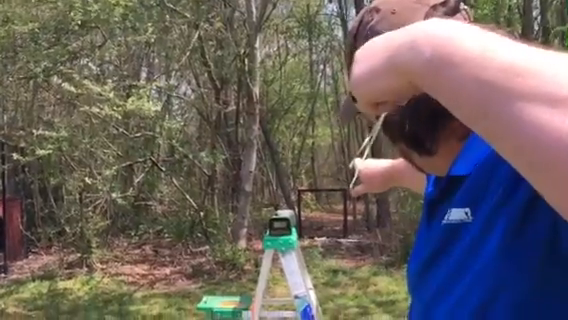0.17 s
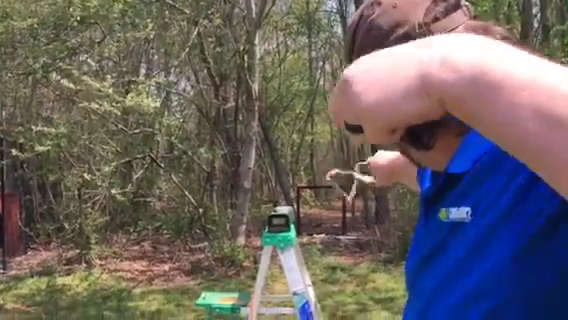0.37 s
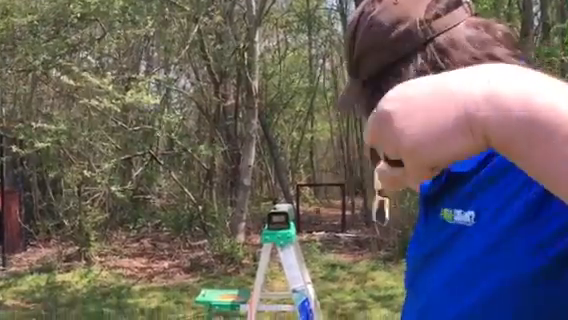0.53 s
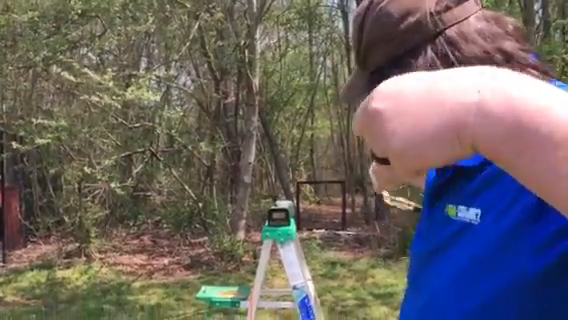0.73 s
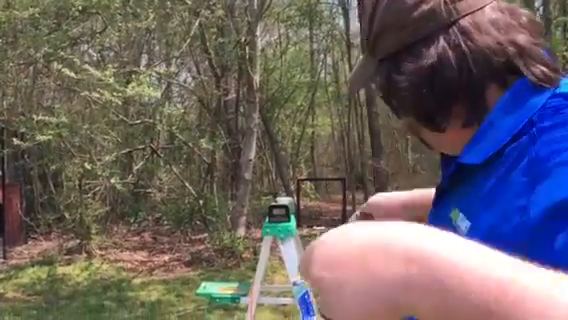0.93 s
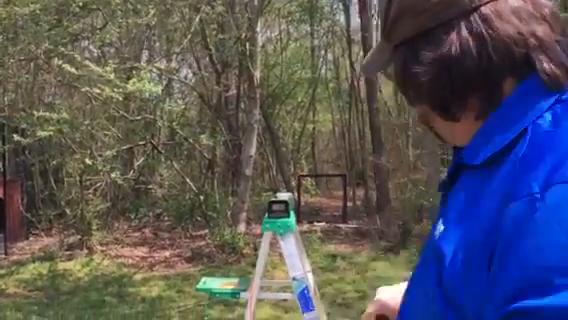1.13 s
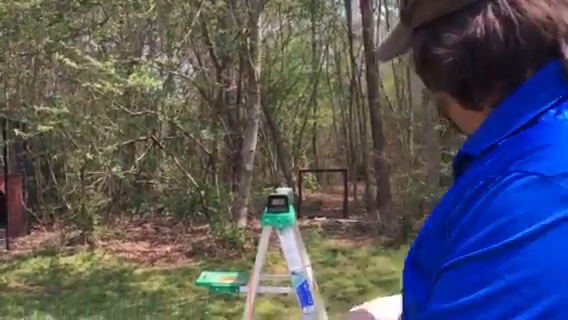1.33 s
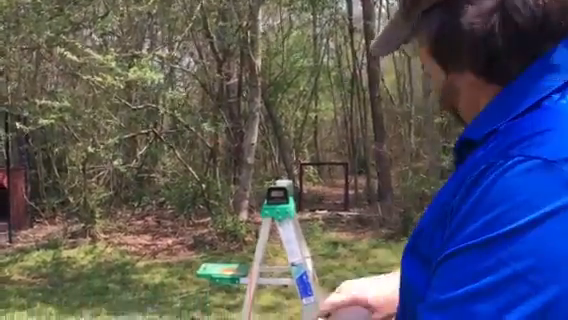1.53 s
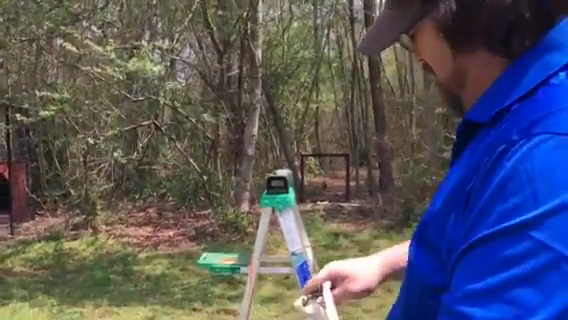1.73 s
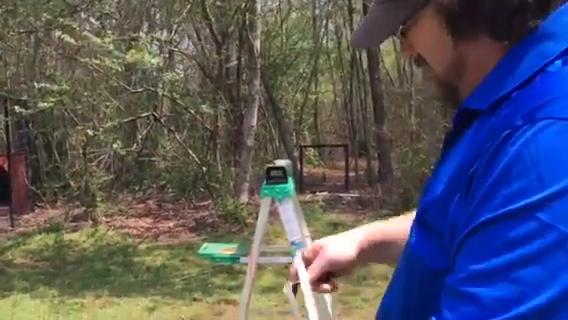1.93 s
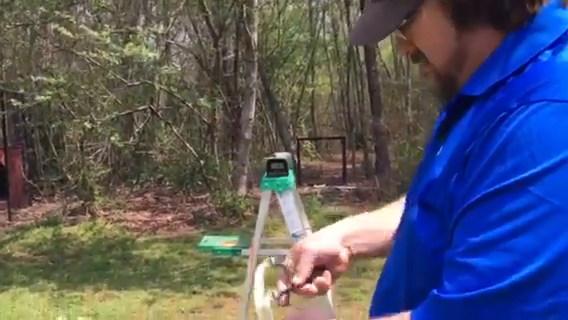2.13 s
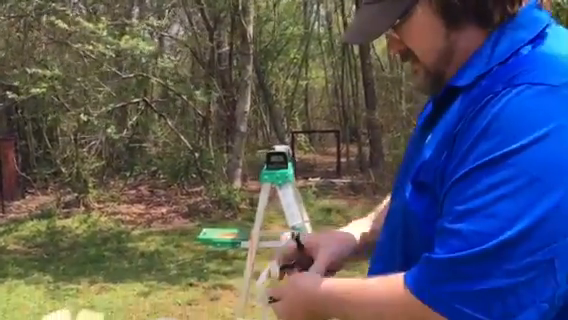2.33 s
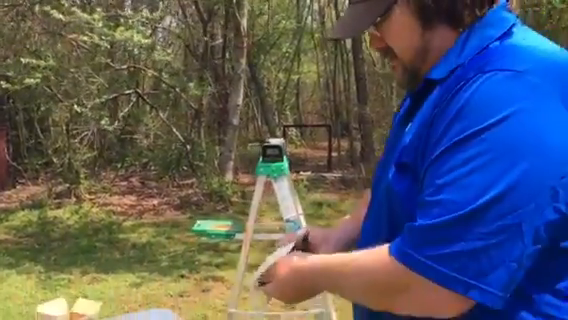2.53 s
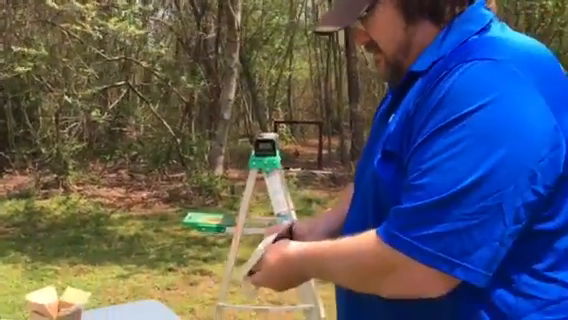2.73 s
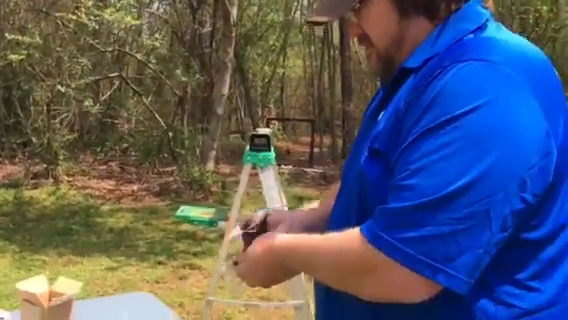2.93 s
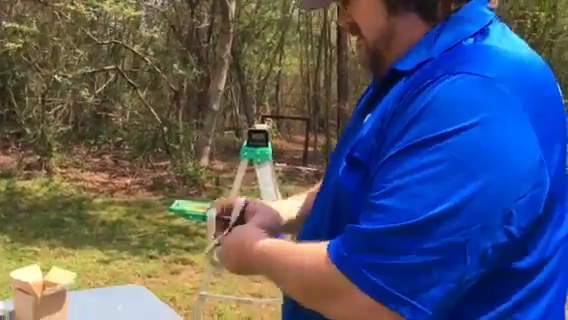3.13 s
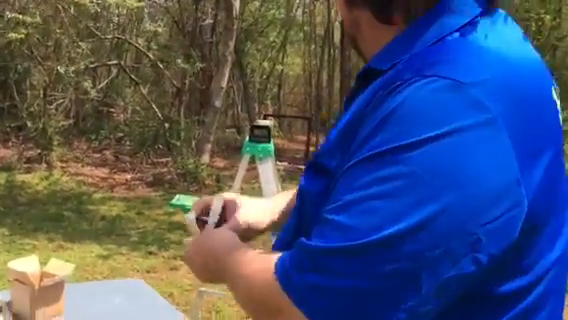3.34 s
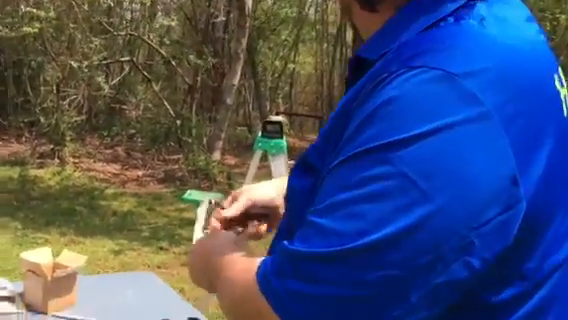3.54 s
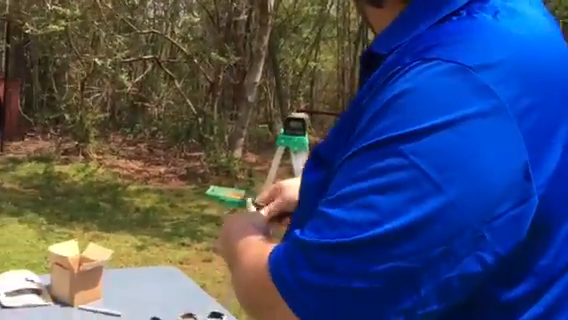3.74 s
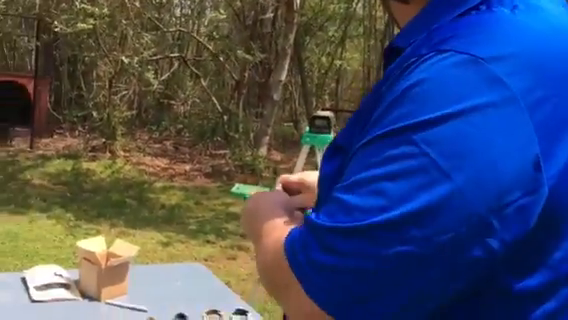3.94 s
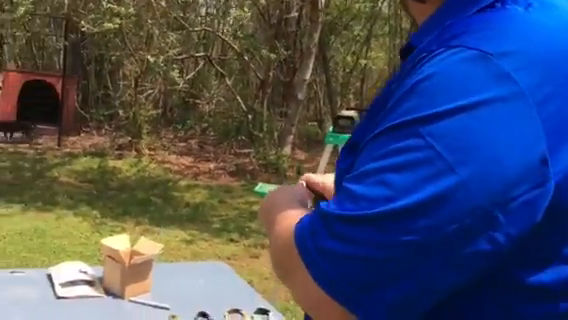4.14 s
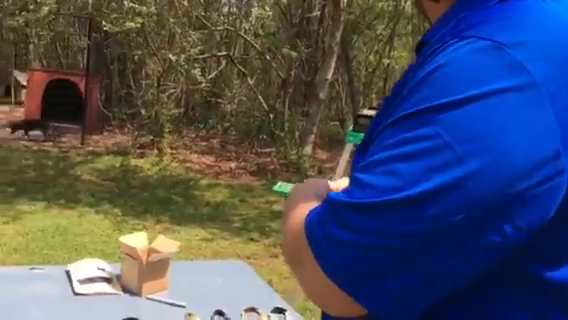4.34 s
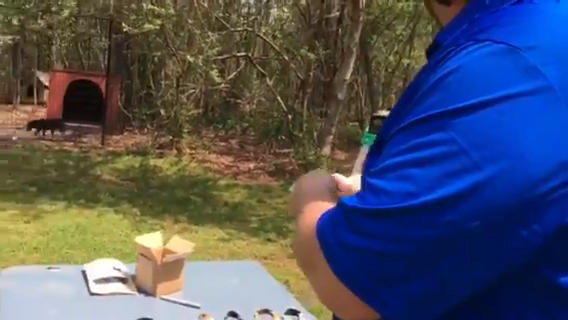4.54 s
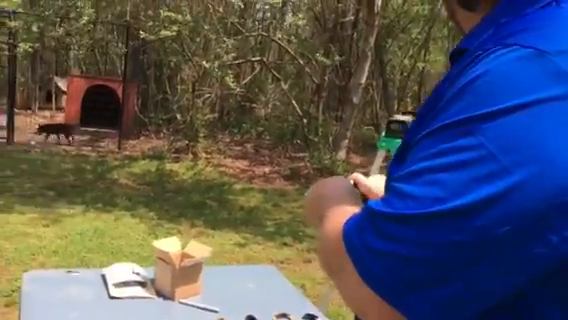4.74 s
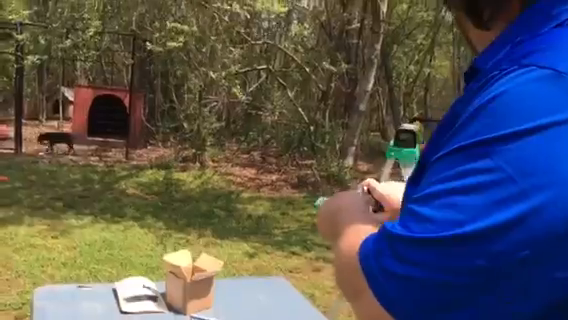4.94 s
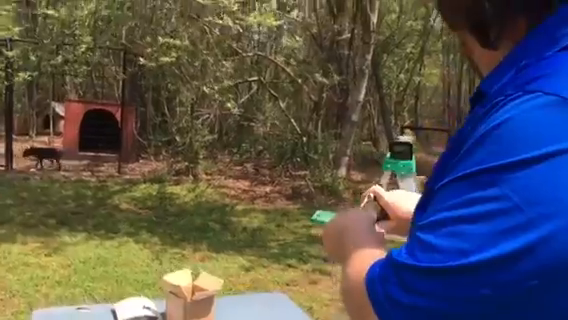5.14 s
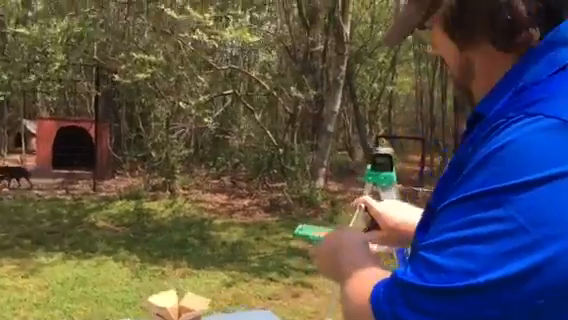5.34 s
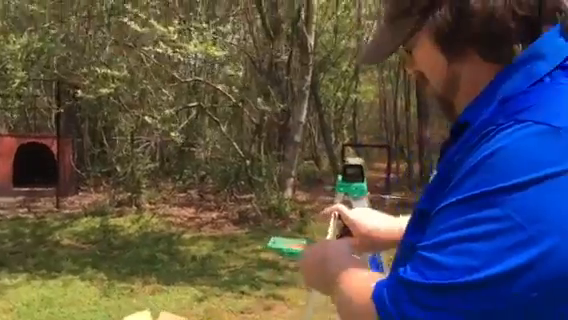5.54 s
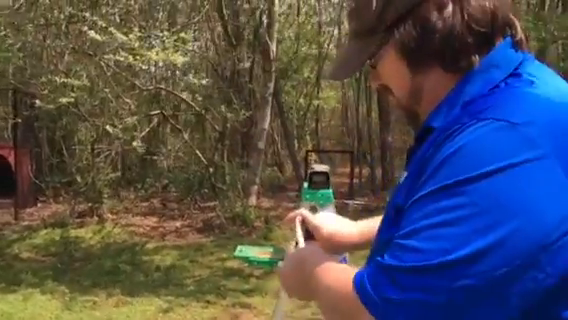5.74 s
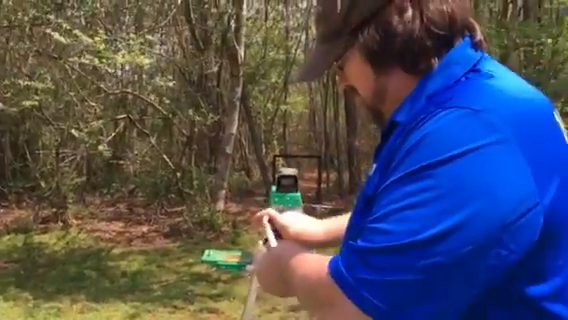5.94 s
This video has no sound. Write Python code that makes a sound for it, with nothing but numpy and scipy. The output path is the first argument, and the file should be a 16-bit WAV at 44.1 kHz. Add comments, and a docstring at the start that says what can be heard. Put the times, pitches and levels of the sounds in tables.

```python
"""A back yard at the edge of a wood: close to the microphone the rubber bands of a slingshot whip forward and
slap twice (grainy coloured noise). Farther off the shot strikes a metal can, which drops and tumbles
(decaying sine modes and noise); the wood answers with a noise tail and two echoes. Close by, hands rub and
sort the bands, with short falling squeaks. Birds whistle among the trees (gliding sines), over a soft
breeze and a distant rush (shaped noise)."""
import sys
import numpy as np
from scipy import signal
from scipy.fft import rfft, irfft, next_fast_len
from scipy.io import wavfile
from scipy.ndimage import map_coordinates

SR = 44100
rng = np.random.default_rng(int(sys.argv[2]) if len(sys.argv) > 2 else 0)


def generate_wav(signal):
    """Clip the signal to [-1, 1] and save it as 16-bit WAV at the path in sys.argv[1]."""
    frames = np.transpose(np.atleast_2d(signal))
    scaled = np.clip(frames, -1, 1) * 32767
    pcm = np.round(scaled).astype(np.int16)
    wavfile.write(sys.argv[1], SR, pcm)


N = 268128

# Spectra are relative: the noise made from them is scaled to rms 1. Shares are of power, 0-1.

# the rubber's snap and the pouch's smack, spectra: f/Hz, level/dB
SNAP_SPECTRUM = [(40, -15), (110, -6.5), (190, 5), (330, -8.5), (600, 4), (1300, -1), (2500, -1.5),
                 (4500, -9), (6600, 1.5), (8500, 0.5), (10300, -7), (12500, -1), (16000, -7)]
SMACK_SPECTRUM = [(60, -17.5), (180, -8.5), (350, -20.5), (700, -17.5), (1400, -20.5), (2300, 1.5),
                  (2800, -7), (3400, 4.5), (4200, -5), (7000, -10), (10300, -15.5), (13000, -9.5),
                  (16000, -16)]
# the bands whip past the fork, then swing back: t/s, level/dB, rebound/dB re snap, share of smack
SNAPS = [(.4, -17, -7, .08), (0.4301, -14.5, -7.5, 0.7)]
# the pouch leaves the fingers, and later cracks against the fork: t/s, level/dB, share of smack
CLICKS = [(0.3785, -41, .2), (.4319, -16.5, .5)]
# rises are e-fold times; the slack rubber slaps again just after each snap
SNAP_RISE_S, SNAP_T60_S, REBOUND_LAG_S, REBOUND_T60_S = 0.0015, 0.014, 0.005, 0.043
# the bands cut the air around the first snap; level re that snap
SWISH_DB, SWISH_RISE_S, SWISH_T60_S = -12.5, 0.0068, 0.07
# air pushed by the pouch, re its snap
FLAP_DB, FLAP_LAG_S = -21, 0.00296
CLICK_RISE_S, CLICK_T60_S = 0.0002, 0.004

# the can's strongest modes, before each blow's level scatter and decay factor: f/Hz, level/dB, t60/s
CAN_MODES = [(835, -8, .08), (885, -14, .2), (912, -12, .22), (1133, -11, .24), (1200, -13, .24),
             (1250, -8, .2), (1436, -7, .22), (1511, -14, .17), (1857, -7, .11), (2229, -9, .14),
             (2275, -7, .1), (2395, -9, .22), (2432, -3, .1), (2540, -11, .16), (3335, -1, .14),
             (3475, -8, .13), (3578, -3, .13), (4480, -6, .1), (4582, -10, .2), (5285, -6, .16),
             (5622, -5, .11), (5990, -5, .12), (6340, -3, .12), (6757, -4, .14), (7311, -9, .17),
             (9355, -16, .2), (11250, -13, .1)]
# the crowd of weaker wall modes, spectrum: f/Hz, level/dB
WALL_SPECTRUM = [(150, -38), (330, -11.5), (700, -9), (950, -3.5), (1400, -4), (2000, -3), (2400, 2.5),
                 (2900, -1.5), (3500, 2), (5000, -2.5), (6500, -4), (8500, -6), (10300, -11.5),
                 (15500, -16.5)]
# their decay, before each blow's decay factor: f/Hz, t60/s
WALL_DECAY = [(300, 0.19), (1200, 0.21), (4000, 0.12), (8000, .13), (15000, 0.061)]
# the crack and the dent thump of a blow, spectra: f/Hz, level/dB
CRACK_SPECTRUM = [(200, -19.5), (800, -3.5), (1700, -10), (3600, -1.5), (6500, 3), (8500, -2), (10300, -14),
                  (12500, -5.5), (16000, -13)]
DENT_SPECTRUM = [(60, -25.5), (220, -22.5), (350, -9.5), (600, -1.5), (900, 3), (1500, -10), (4000, -37)]
# the shot's blow: level/dB, crack/dB, dent/dB, modes/dB, decay factor, rattle depth/dB
STRIKE = (-22, 9, -4.5, -6, 1.05, 0.5)
# the can lands and tumbles: t/s, level/dB
TUMBLES = [(1.0998, -44.5), (1.113, -45.5), (1.1496, -48.5), (1.274, -51), (1.297, -57.5), (1.346, -77),
           (1.4135, -59), (1.465, -63.5), (1.511, -63), (1.69, -60.5)]
STRIKE_S = 0.5764
# softer contacts are duller: crack lost for each dB below the landing
LANDING_CRACK_DB, CRACK_PER_DB = 5, 0.2
GROUND_DENT_DB, GROUND_MODES_DB, GROUND_DECAY_FACTOR, GROUND_RATTLE_DB = -9, -8, 1.45, 3

# hands on rubber and cloth, except the brief one at 2.061 s, a bird's chip made of noise: t/s, level/dB, t60/s,
# share of dull rubbing
RUBS = [(1.087, -51, 0.2, 0.62), (1.984, -65, 0.081, 0.03), (2.061, -62.5, .025, .7),
        (2.215, -66, 0.069, .5), (2.812, -61.5, .17, 0), (3.055, -50, 0.11, 0.3), (3.076, -56.5, .04, 0),
        (3.107, -62, 0.16, 0.44), (3.341, -54, 0.027, 0.01), (3.803, -59.5, 0.15, 0.43),
        (4.67, -69, 0.28, 0), (4.992, -62, 0.028, .3), (5.481, -51, 0.069, 0), (5.507, -50.5, 0.065, 0),
        (5.521, -50, .055, 0.98), (5.769, -67.5, .05, 0.2), (6.01, -67.5, 0.54, 0.23)]
# brisk and dull rubbing, spectra: f/Hz, level/dB
BRISK_SPECTRUM = [(200, -4), (900, 1), (2000, 3), (3500, 1), (7000, 4), (10300, -2.5), (13000, -3.5),
                  (16000, -9)]
DULL_SPECTRUM = [(200, -20), (1150, -16), (1500, -3), (2000, -11), (3500, -1.5), (5500, -7), (9000, -31),
                 (16000, -37)]
# rubber slipping over skin: t/s, level/dB, length/s, start f/Hz, end f/Hz
SQUEAKS = [(3.096, -60, 0.024, 2610, 2283), (3.336, -56.5, 0.01, 2000, 1750), (5.5, -53, .014, 6400, 3650),
           (5.514, -47.5, 0.016, 1724, 1410)]
# a slow rub also swells slowly: e-fold rise time over t60
RISE_PER_T60 = 0.12

# another bird chips in even runs: start t/s, end t/s, gap/s, level/dB
CHIP_RUNS = [(0.023, .4, .265, -65.5), (1.609, 2.58, .15, -57.5)]
# one chip: length/s, start f/Hz, end f/Hz, share scattered
CHIP = (.024, 3950, 3200, .6)
# single whistles of other birds: t/s, level/dB, length/s, start f/Hz, end f/Hz, share scattered
WHISTLES = [(-.03, -71.5, .2, 6850, 7200, .07), (.04, -72, .12, 3200, 3174, .5),
            (.24, -65.5, .11, 3080, 3120, .8), (1.335, -56.5, 0.063, 2546, 2650, 0.36),
            (1.809, -60.5, 0.11, 2310, 2540, 0.86), (2.27, -64, 0.13, 1850, 2200, .95),
            (2.348, -59, .12, 2264, 2513, 0.55), (2.293, -66.5, 0.093, 3250, 3300, 0.7),
            (2.55, -62.5, 0.13, 3480, 3567, 0.64), (2.769, -67, .05, 2350, 2480, 0.4),
            (2.885, -63.5, 0.09, 3280, 3190, 0.57), (3.33, -69.5, 0.15, 2250, 1476, 0.65),
            (3.451, -65, 0.0555, 2310, 2476, 0), (3.584, -58.5, 0.076, 3130, 3114, 0.26),
            (5.548, -74, 0.22, 7080, 7200, .25), (5.56, -79, 0.14, 5510, 5500, .3),
            (5.83, -68.5, 0.057, 5900, 6200, 0.6)]
# the nearest bird repeats an upward and a downward slur, the first pair quieter by the warm-up
SONG_S, SONG_GAP_S, SONG_PAIRS, SONG_WARMUP_DB = 3.783, 0.384, 5, 3
UP_DB, DOWN_DB, DOWN_LAG_S = -63, -61.5, 0.081
# a note holds, then slides towards its end pitch: steepness, share of its length at mid-glide
GLIDE_EASE, GLIDE_MIDPOINT = 3.5, 0.34
# it swells, sags by its end and stops
WHISTLE_ATTACK_S, WHISTLE_SAG_DB, WHISTLE_RELEASE_S = 0.011, 8.5, 0.017

# decay of the wood's tail: f/Hz, t60/s
WOOD_DECAY = [(200, 0.55), (1000, 1), (3000, .8), (6500, .65), (10000, 0.62), (15000, 0.55)]
# spectra of the wood's tail and of the echoes: f/Hz, level/dB
WOOD_SPECTRUM = [(100, -8.5), (650, -5.5), (1000, 0), (2000, -3), (6500, -2), (10000, -2), (15000, -5.5)]
ECHO_SPECTRUM = [(300, -15), (700, -9.5), (1000, 6), (1500, 2), (2500, -4.5), (4000, 2.5), (7000, 0),
                 (13000, 0.5)]
# two broad surfaces across the yard: delay/s, level/dB before trees() adds echo_db
ECHOES = [(.074, -14), (.174, -17)]

# breeze rumble and distant rush, spectra: f/Hz, level/dB
RUMBLE_SPECTRUM = [(13, -37.5), (22, -15.5), (43, 1), (76, -3), (108, -0.5), (144, -8.5), (258, -13.5),
                   (299, -25), (350, -19.5), (400, -25.5), (520, -48.5), (880, -120)]
RUSH_SPECTRUM = [(150, -26), (250, -3), (459, -6.5), (627, -4.5), (772, -7.5), (967, -8), (1740, -10.5),
                 (2740, -18.5), (3200, -17), (4860, -24), (6300, -23), (10400, -30), (15000, -30),
                 (15800, -36.5)]
# level curves of rumble and rush, before the trims set in scene(): t/s, level/dB
RUMBLE_LEVEL = [(0.0, -64), (0.05, -59), (0.36, -55.5), (1.18, -60), (1.29, -56.5), (1.32, -59),
                (5.01, -57), (5.21, -57), (6.08, -55)]
RUSH_LEVEL = [(0.05, -65.5), (0.35, -64.5), (1.9, -63.5), (2.67, -63.5), (3.91, -65.5), (5.9, -64.5),
              (6.08, -63)]
# puffs of air on the microphone: t/s, level/dB
BUFFETS = [(.96, -42.5), (1.223, -47.5), (1.288, -44), (1.42, -50), (5.249, -45.5), (5.44, -47)]
BAND_LIMIT_HZ = 15900


def slingshot():
    """The bands swish forward; each snap is followed by a small rebound and a puff of air."""
    first_s, first_db, _, first_share = SNAPS[0]
    slaps = [(first_s, first_db + SWISH_DB, SWISH_RISE_S, SWISH_T60_S, first_share)]
    for s, db, rebound_db, share in SNAPS:
        slaps.append((s, db, SNAP_RISE_S, SNAP_T60_S, share))
        slaps.append((s + REBOUND_LAG_S, db + rebound_db, SNAP_RISE_S / 2, REBOUND_T60_S, share))
    slaps += [(s, db, CLICK_RISE_S, CLICK_T60_S, share) for s, db, share in CLICKS]
    flaps = [(s + FLAP_LAG_S, db + FLAP_DB) for s, db, _, _ in SNAPS]
    rubber = strokes(slaps, SNAP_SPECTRUM, SMACK_SPECTRUM, grain_db=1, grain_rate=2700)
    return rubber + puffs(flaps, width=0.007, pitch_hz=178.15)


def strokes(rows, main_spectrum, other_spectrum, grain_db, grain_rate):
    """Rubber contacts swell, peak and die; sticking and slipping makes them grainy."""
    out = np.zeros(N)
    t = np.arange(-SR // 5, SR // 3) / SR  # the peak is at 0
    for s, db, rise, t60, share in rows:
        share = np.clip(share, 0, 1)
        main = np.sqrt(1 - share) * noise(main_spectrum, len(t))
        other = np.sqrt(share) * noise(other_spectrum, len(t))
        grain = unit(amp(grain_db * wobble(grain_rate, len(t))))
        shape = np.exp(np.minimum(t, 0) / rise) * fade(np.maximum(t, 0), t60)
        add(out, s + t[0], amp(db) * shape * grain * (main + other))
    return out


def can(wall_db, crack_t60, dent_t60, rattle_rate, wood_db, ring_wet_db, buckle):
    """Each blow cracks, dents the thin wall, rattles it and rings its modes; the wood answers."""
    direct, rings, kicks = np.zeros((3, N))
    t = np.arange(SR // 2) / SR
    for s, db, crack_db, dent_db, modes_db, decay_factor, rattle_db in blows():
        # the flexing wall keeps detuning its modes: a random walk of phase, in turns
        steps = rng.standard_normal((len(CAN_MODES), len(t)))
        drift = buckle * np.cumsum(steps, axis=1) / np.sqrt(SR)
        ring = np.zeros(len(t))
        for (hz, level, t60), turns in zip(CAN_MODES, drift):
            gain = amp(level + rng.normal(0, 1.5))
            phase = hz * t + rng.random() + turns
            ring += gain * fade(t, t60 * decay_factor) * np.sin(2 * np.pi * phase)
        rattle = unit(amp(rattle_db * wobble(rattle_rate, SR)[:len(t)]))
        wall_decay = [(hz, t60 * decay_factor) for hz, t60 in WALL_DECAY]
        wall = amp(wall_db) * rattle * dying(WALL_SPECTRUM, wall_decay, len(t))
        crack = amp(crack_db) * fade(t, crack_t60) * noise(CRACK_SPECTRUM, len(t))
        dent = amp(dent_db) * fade(t, dent_t60) * noise(DENT_SPECTRUM, len(t))
        add(direct, s, amp(db) * (wall + crack + dent))
        add(rings, s, amp(db + modes_db) * ring)
        add(kicks, s, amp([db + wood_db]))  # a single-sample impulse
    # the wood answers mostly the first broad burst of each blow
    burst = filtered(kicks, lambda hz: amp(along(WALL_SPECTRUM, hz)))
    to_wood = burst + amp(ring_wet_db) * rings
    return direct + rings + trees(to_wood, scatter_db=-6.5, build_up=0.017, echo_t60=0.063)


def blows():
    """The strike, then the contacts with the ground, which crack less as they weaken."""
    landing_db = TUMBLES[0][1]
    rows = [(STRIKE_S, *STRIKE)]
    for s, db in TUMBLES:
        crack_db = LANDING_CRACK_DB + CRACK_PER_DB * (db - landing_db)
        rows.append((s, db, crack_db, GROUND_DENT_DB, GROUND_MODES_DB,
                     GROUND_DECAY_FACTOR, GROUND_RATTLE_DB))
    return rows


def hands():
    """Fingers rub and sort the bands, which squeak now and then."""
    rubs = [(s, db, RISE_PER_T60 * t60, t60, share) for s, db, t60, share in RUBS]
    rubbing = strokes(rubs, BRISK_SPECTRUM, DULL_SPECTRUM, grain_db=2.5, grain_rate=590)
    return rubbing + squeaks(rough=0.095)


def squeaks(rough):
    """A sticking band lets go and slips with a short, rough, falling squeak."""
    out = np.zeros(N)
    for s, db, length, start_hz, end_hz in SQUEAKS:
        u = np.linspace(0, 1, int(length * SR))
        roughness = np.exp(rough * wobble(1400, SR)[:len(u)])
        pitch = start_hz * (end_hz / start_hz) ** u * roughness
        tone = np.sin(2 * np.pi * np.cumsum(pitch) / SR)
        add(out, s, amp(db) * np.sin(np.pi * u) * tone)
    return out


def birds(waver, flutter_db, canopy_t60):
    """Whistles glide in pitch; the deeper in the wood, the more of each arrives smeared."""
    out = np.zeros(N)
    after = np.arange(SR // 2) / SR
    for s, db, length, start_hz, end_hz, scattered, glide_s in notes():
        t = np.arange(int(length * SR)) / SR
        glide = end_hz + (start_hz - end_hz) / (1 + (t / glide_s) ** GLIDE_EASE)
        pitch = glide * (1 + waver * wobble(200, SR)[:len(t)])
        gate = np.clip(np.minimum(t / WHISTLE_ATTACK_S, (length - t) / WHISTLE_RELEASE_S), 0, 1)
        sag_db = WHISTLE_SAG_DB * np.sqrt(t / length)
        loudness = gate * amp(db - sag_db + flutter_db * wobble(88, SR)[:len(t)])
        whistle = loudness * np.sin(2 * np.pi * np.cumsum(pitch) / SR)
        scattered = np.clip(scattered, 0, 1)
        canopy = rng.standard_normal(len(after)) * fade(after, canopy_t60)
        smeared = signal.fftconvolve(whistle, canopy / np.linalg.norm(canopy))
        add(out, s, np.sqrt(1 - scattered) * whistle)
        add(out, s, np.sqrt(scattered) * smeared)
    return out


def notes():
    """Every bird note: the repeated pair of slurs, the runs of chips and the single whistles."""
    # length/s, start f/Hz, end f/Hz, share scattered by the trees, time to mid-glide/s
    up_slur = (0.11, 3250, 3590, 0.7, 0.025)
    down_slur = (0.145, 2280, 1440, 0.18, 0.062)
    rows = []
    for k in range(SONG_PAIRS):
        s = SONG_S + k * SONG_GAP_S
        shy_db = SONG_WARMUP_DB / (1 + k) ** 2
        rows.append((s, UP_DB - shy_db, *up_slur))
        rows.append((s + DOWN_LAG_S, DOWN_DB - shy_db, *down_slur))
    chips = [(s, db, *CHIP) for start, end, gap, db in CHIP_RUNS for s in np.arange(start, end, gap)]
    for s, db, length, *shape in chips + WHISTLES:
        rows.append((s, db, length, *shape, GLIDE_MIDPOINT * length))
    return rows


def trees(x, scatter_db, build_up, echo_t60, echo_db=0):
    """Trunks scatter the sound into a soft tail; two larger surfaces return smeared echoes."""
    t = np.arange(SR) / SR
    tail = dying(WOOD_SPECTRUM, WOOD_DECAY, len(t)) * (1 - np.exp(-t / build_up))
    answer = amp(scatter_db) * tail / np.linalg.norm(tail)
    for delay, db in ECHOES:
        echo = noise(ECHO_SPECTRUM, len(t)) * fade(np.abs(t - delay), echo_t60)
        answer = answer + amp(db + echo_db) * echo / np.linalg.norm(echo)
    return signal.fftconvolve(x, answer)[:N]


def air(rumble_db, rush_db, gust_db):
    """A light breeze rumbles unevenly under the rush of the distance, which eases and swells."""
    t = np.arange(N) / SR
    rumble_level = np.interp(t, *np.transpose(RUMBLE_LEVEL)) + rumble_db
    rush_level = np.interp(t, *np.transpose(RUSH_LEVEL)) + rush_db
    rumble = amp(rumble_level + gust_db * wobble(12, N)) * noise(RUMBLE_SPECTRUM, N)
    return rumble + amp(rush_level) * noise(RUSH_SPECTRUM, N)


def puffs(rows, width, pitch_hz):
    """Each puff of air rocks the microphone for a few unsteady cycles under a bell-shaped swell."""
    out = np.zeros(N)
    t = np.arange(-SR // 10, SR // 10) / SR
    for s, db in rows:
        turns = np.cumsum(pitch_hz * np.exp(0.22 * wobble(60, len(t)))) / SR
        add(out, s + t[0], amp(db) * np.exp(-(t / width) ** 2) * np.sin(2 * np.pi * turns))
    return out


def amp(db):
    """Decibels to gain."""
    return 10 ** (np.asarray(db) / 20)


def unit(x):
    """Scale to rms 1."""
    return x / np.sqrt(np.mean(x ** 2) + 1e-20)


def along(points, hz):
    """Read (f/Hz, value) points on a log frequency axis."""
    f, v = np.transpose(points)
    return np.interp(np.log(hz + 1), np.log(f), v)


def filtered(x, response):
    """Multiply the spectrum of x by a response of frequency."""
    m = next_fast_len(len(x) + SR // 4)
    hz = np.fft.rfftfreq(m, 1 / SR)
    return irfft(rfft(x, m) * response(hz), m)[:len(x)]


def noise(spectrum, size):
    """Coloured noise of rms 1."""
    return unit(filtered(rng.standard_normal(size), lambda hz: amp(along(spectrum, hz))))


def dying(spectrum, decay, size):
    """Coloured noise in which each frequency dies at its own speed."""
    hz, t, z = signal.stft(noise(spectrum, size), SR, nperseg=256)
    loss_db = -60 * t / along(decay, hz)[:, None]
    return signal.istft(z * amp(loss_db), SR, nperseg=256)[1][:size]


def fade(t, t60):
    """Exponential decay by 60 dB in t60."""
    return np.exp(-np.log(1000) * t / t60)


def wobble(rate, size):
    """A smooth random curve, rate knots a second."""
    knots = rng.standard_normal(int(size * rate / SR) + 4)
    return map_coordinates(knots, [np.arange(size) * rate / SR])


def add(track, s, sound):
    """Mix a sound into the track at time s, trimmed to the track's ends."""
    start = round(s * SR)
    part = sound[max(-start, 0):max(N - start, 0)]
    track[max(start, 0):][:len(part)] += part


def scene():
    """Slingshot and hands close to the microphone, the can farther off, birds among the trees."""
    near = slingshot() + hands()
    near = near + trees(near, scatter_db=-18.5, build_up=0.004, echo_t60=0.07, echo_db=-16)
    target = can(wall_db=0.5, crack_t60=0.026, dent_t60=0.066, rattle_rate=440,
                 wood_db=33.0, ring_wet_db=-7, buckle=1.1)
    song = birds(waver=0.009, flutter_db=4.0, canopy_t60=0.93)  # waver is a share of the pitch
    breeze = air(rumble_db=0.5, rush_db=-1.5, gust_db=1.8)
    buffets = puffs(BUFFETS, width=0.016, pitch_hz=51.2)
    return (near + target + song + breeze + buffets)[None]


def record(dry):
    """The microphone channel cuts off very steeply above its band limit."""
    return filtered(dry[0], lambda hz: 1 / np.sqrt(1 + (hz / BAND_LIMIT_HZ) ** 300))[None]


dry = scene()
out = record(dry)
generate_wav(out)
```